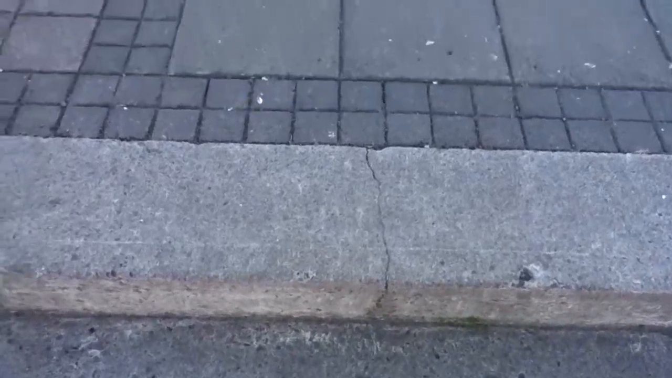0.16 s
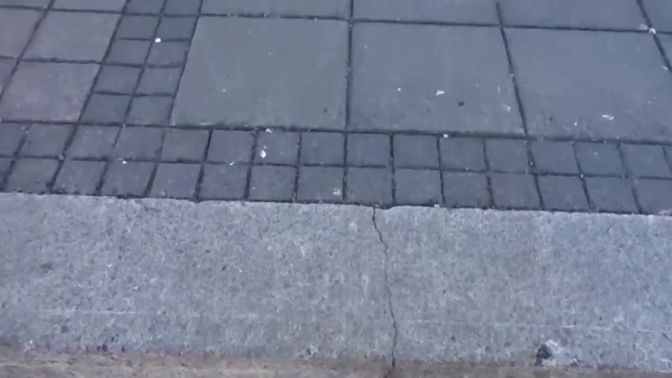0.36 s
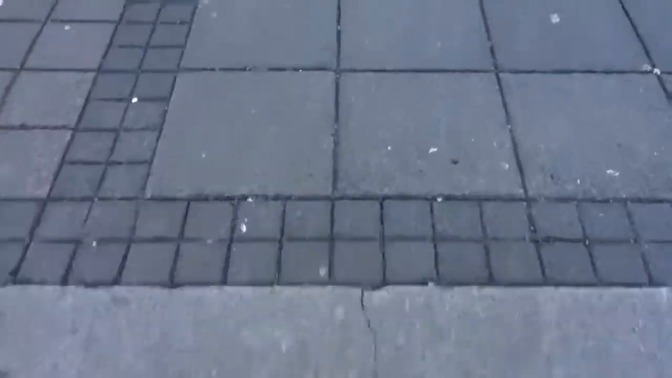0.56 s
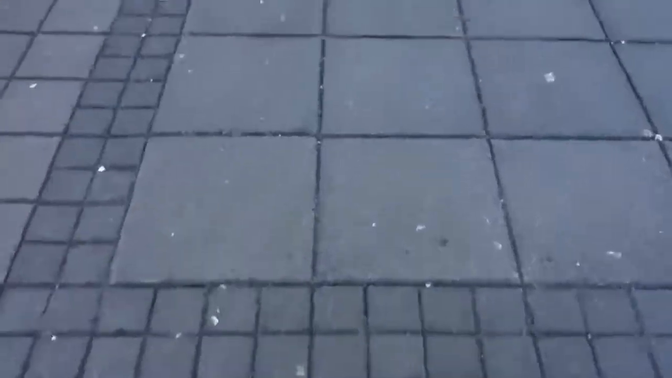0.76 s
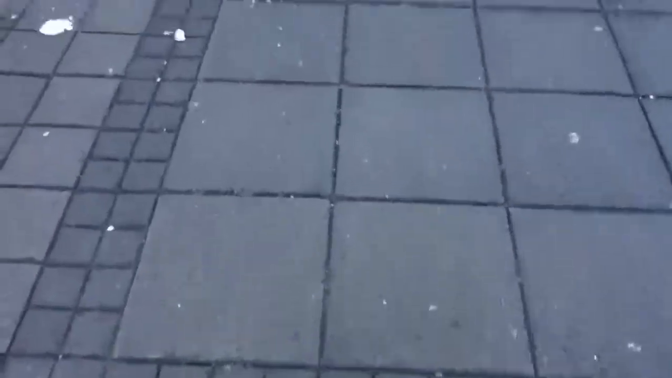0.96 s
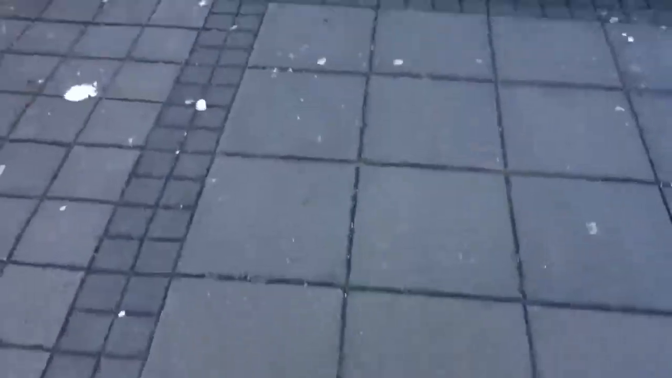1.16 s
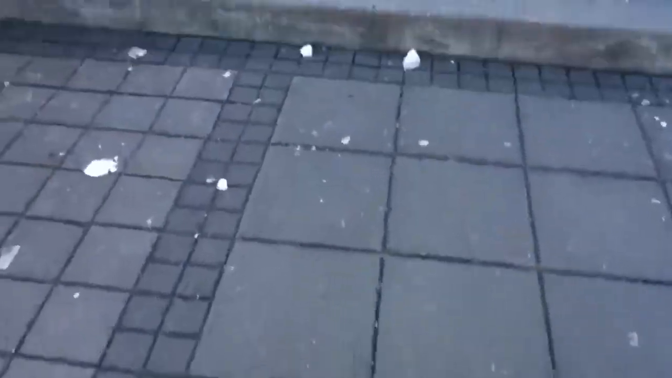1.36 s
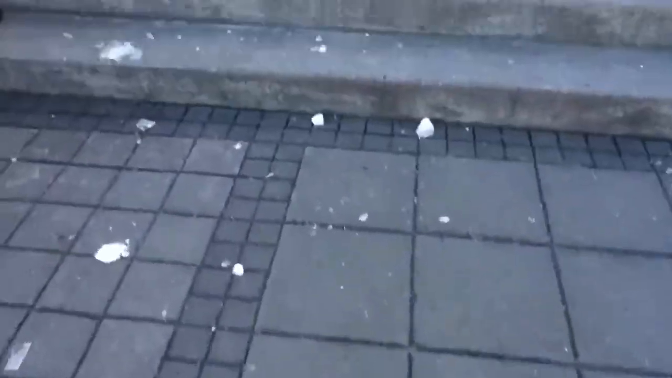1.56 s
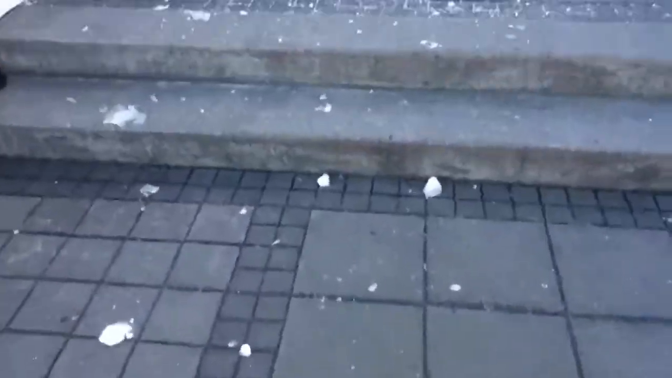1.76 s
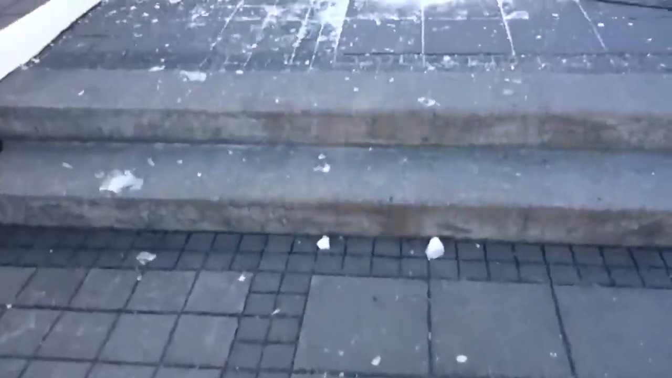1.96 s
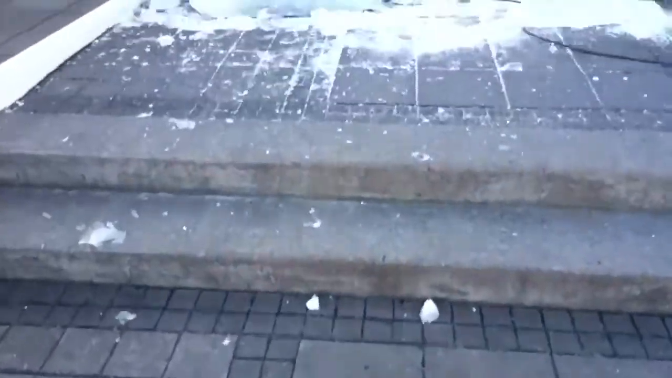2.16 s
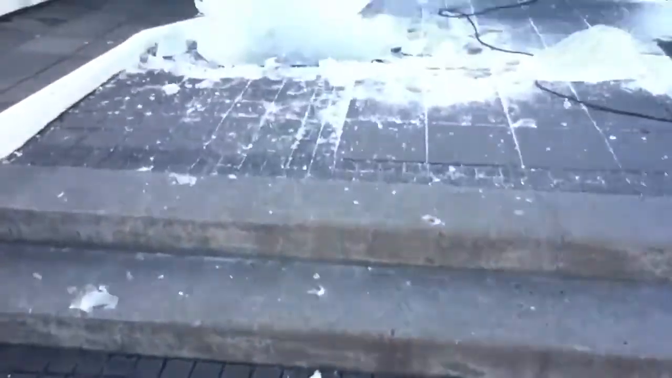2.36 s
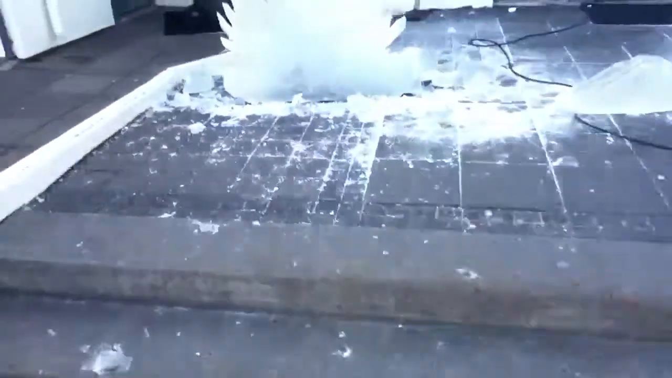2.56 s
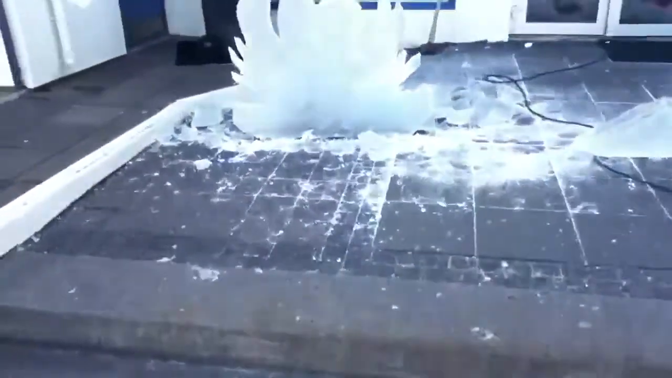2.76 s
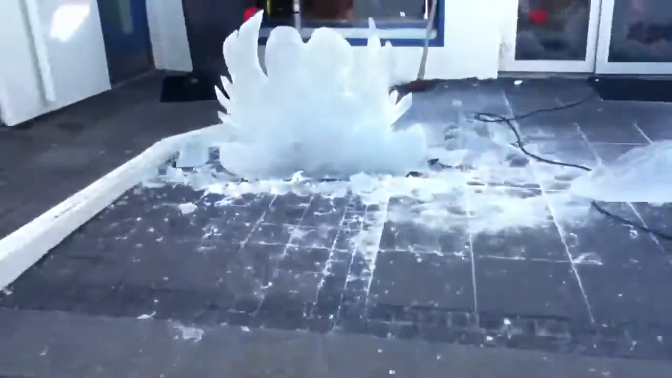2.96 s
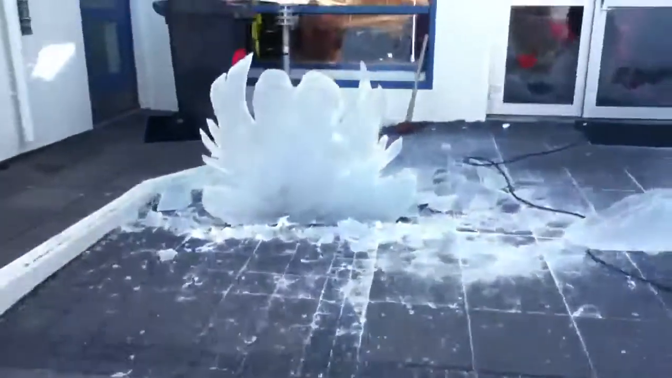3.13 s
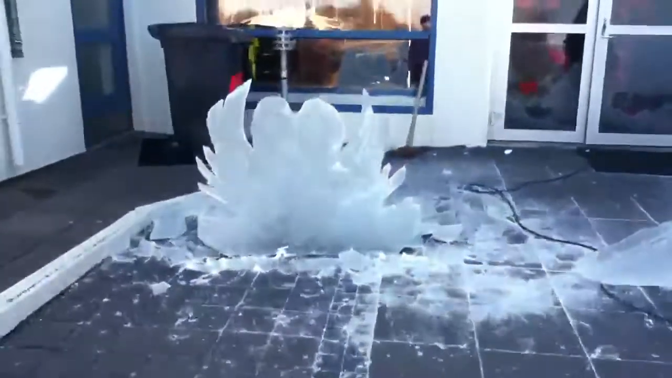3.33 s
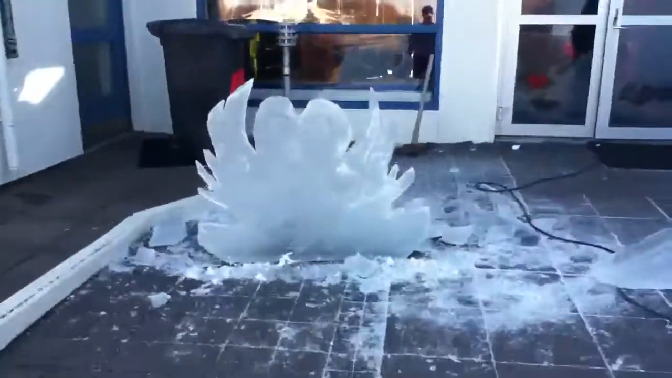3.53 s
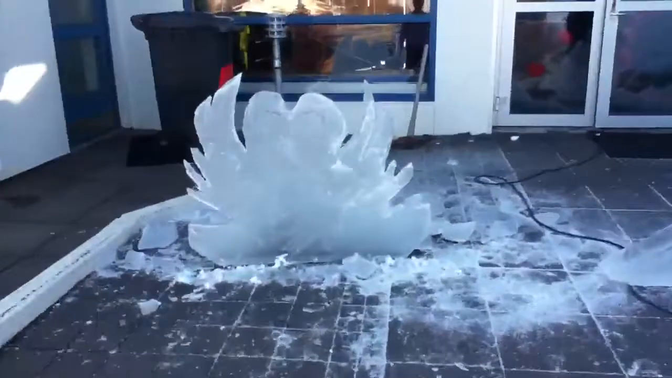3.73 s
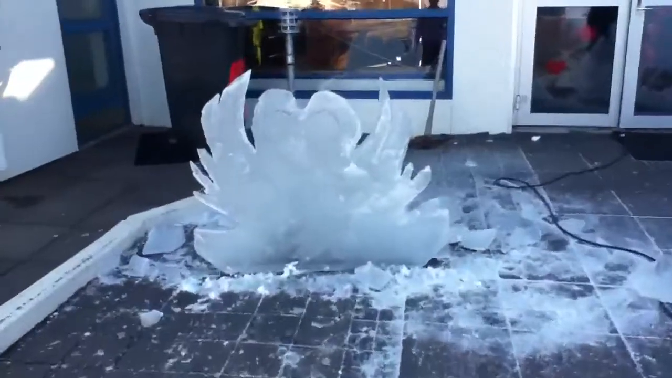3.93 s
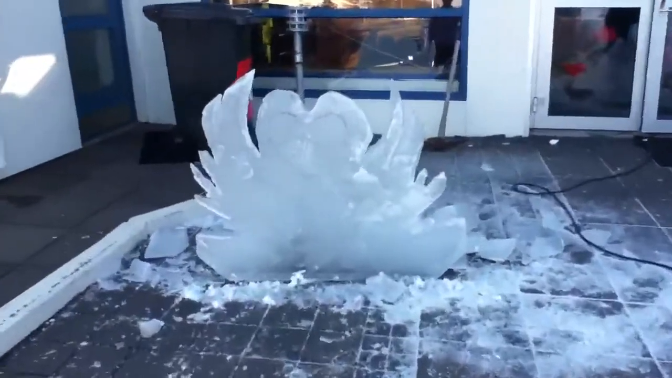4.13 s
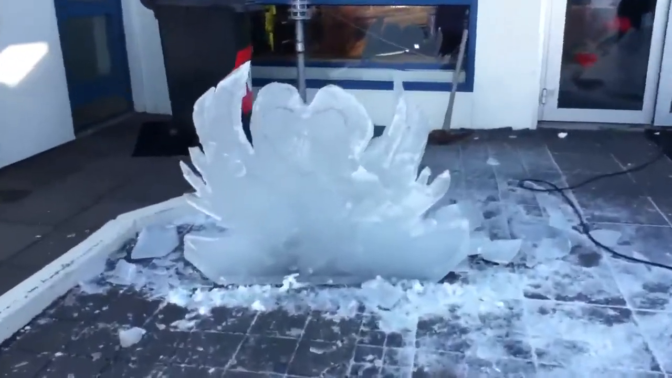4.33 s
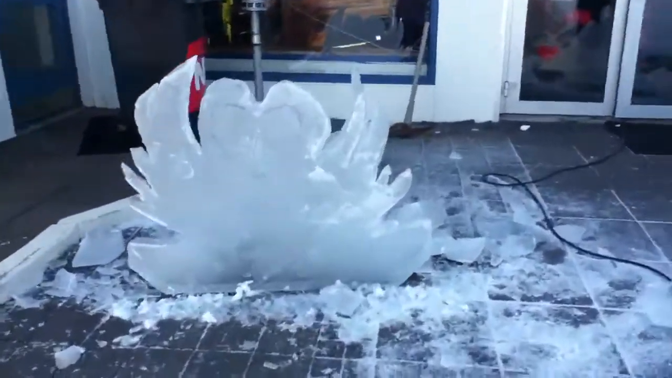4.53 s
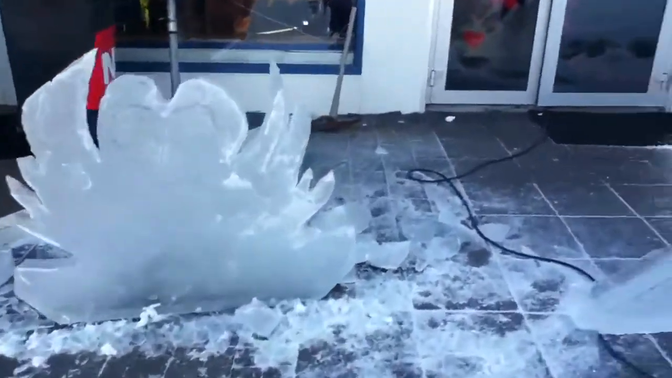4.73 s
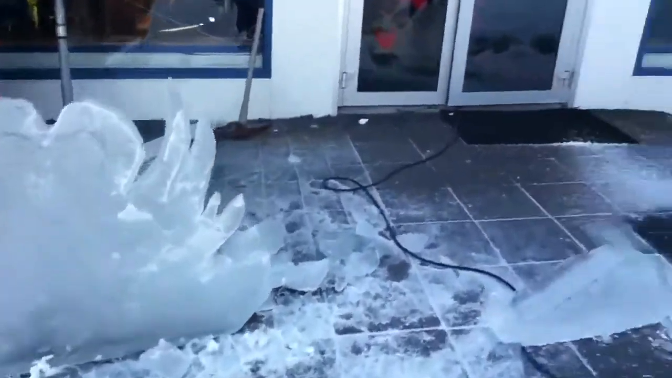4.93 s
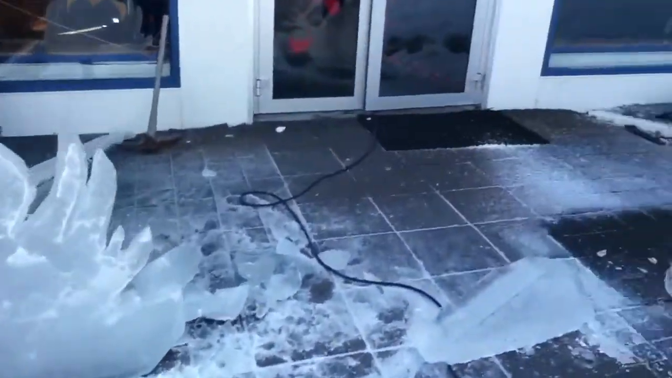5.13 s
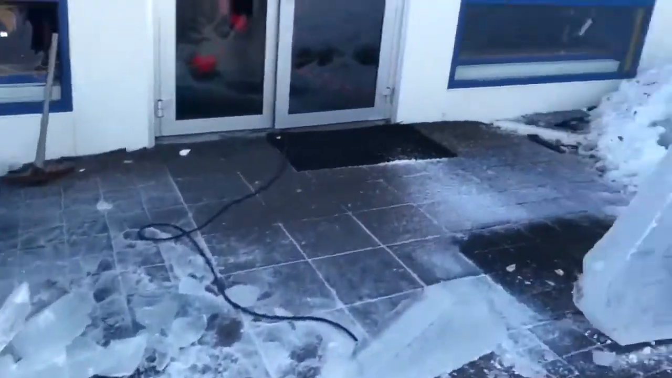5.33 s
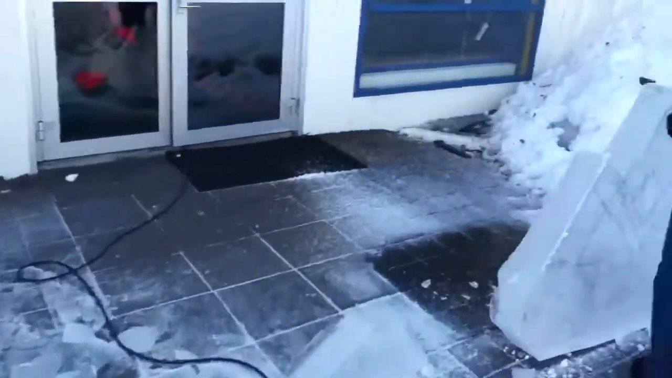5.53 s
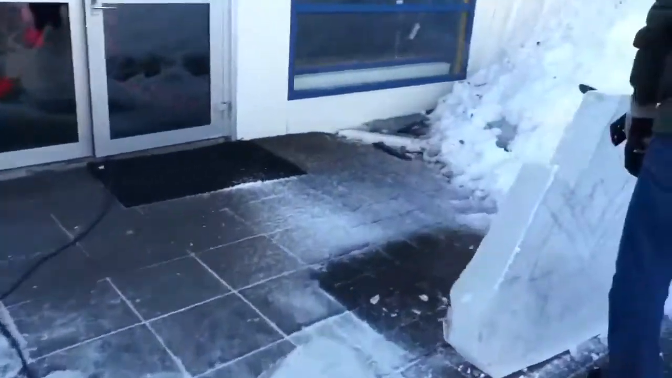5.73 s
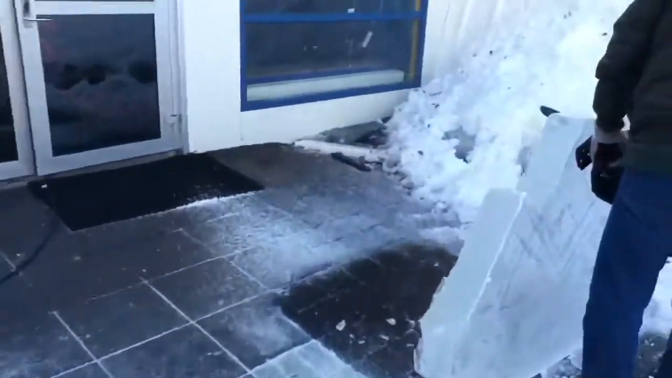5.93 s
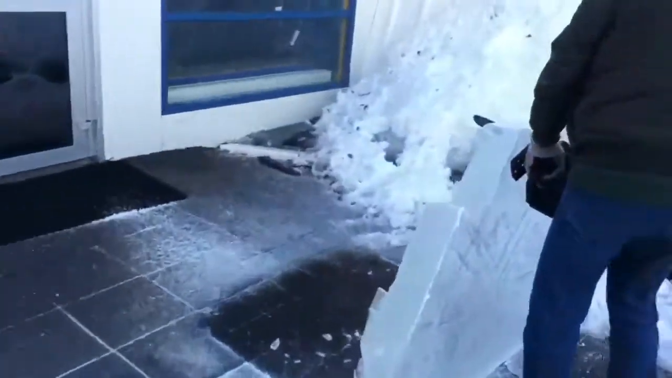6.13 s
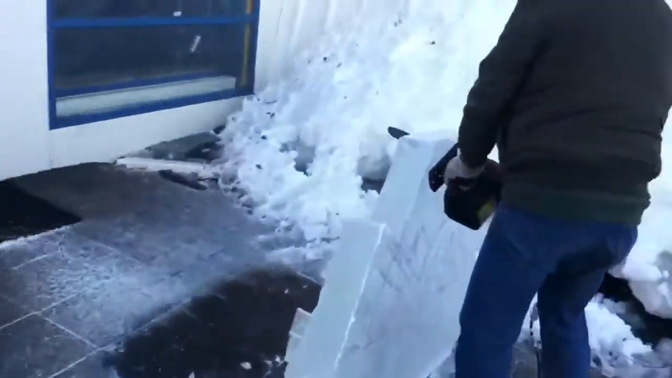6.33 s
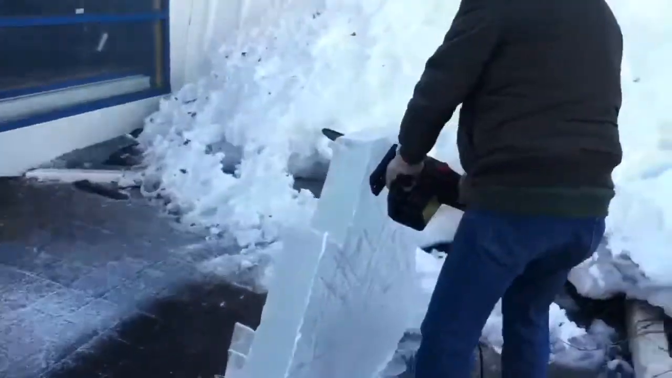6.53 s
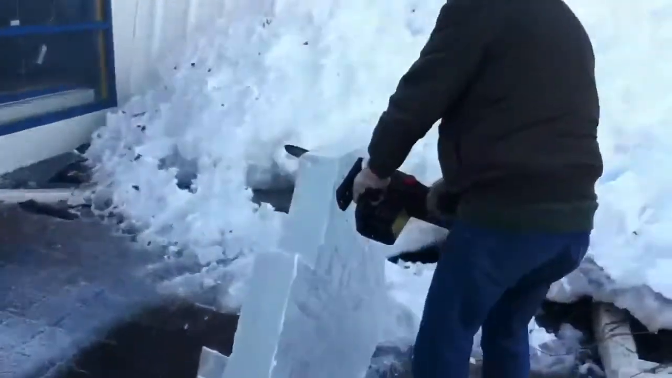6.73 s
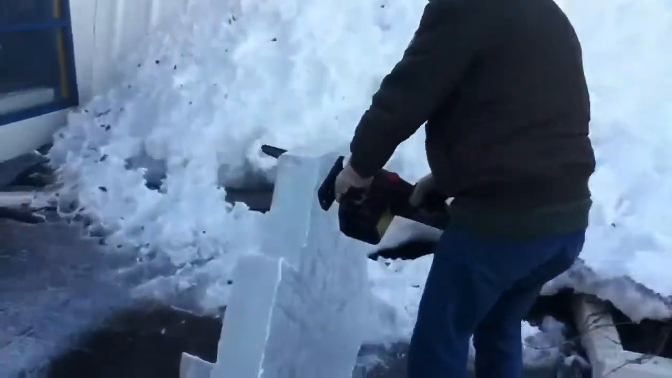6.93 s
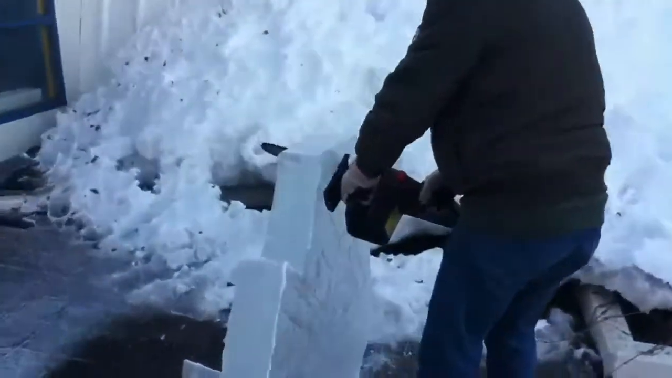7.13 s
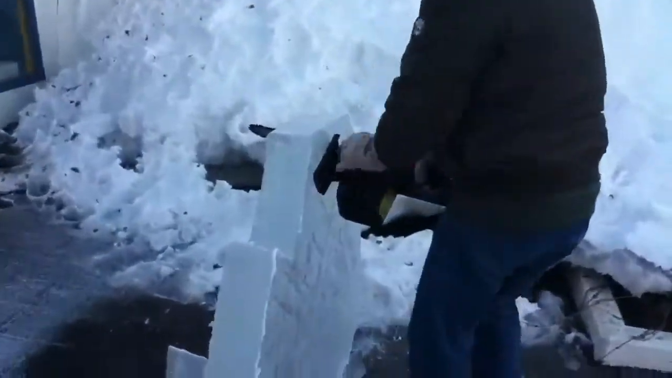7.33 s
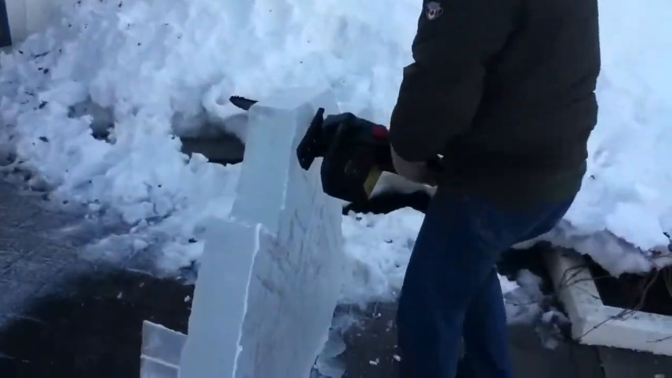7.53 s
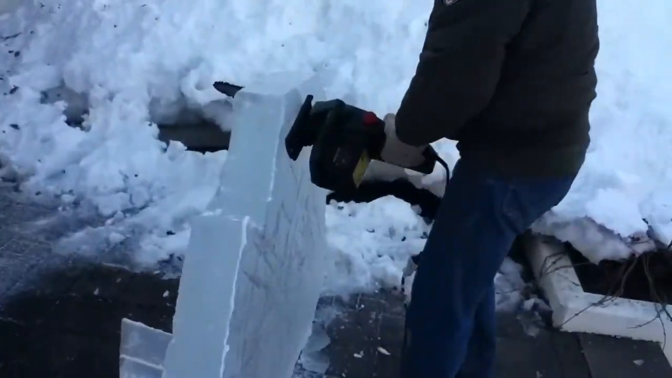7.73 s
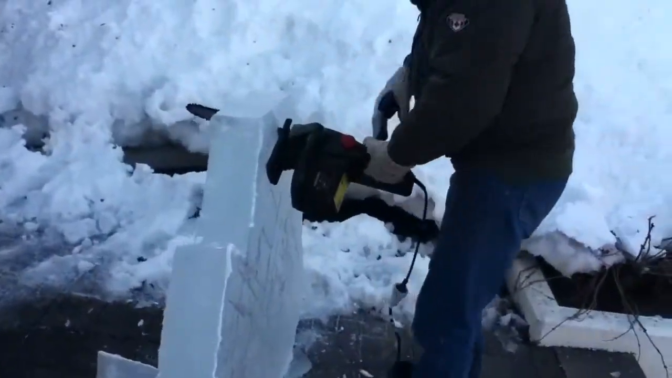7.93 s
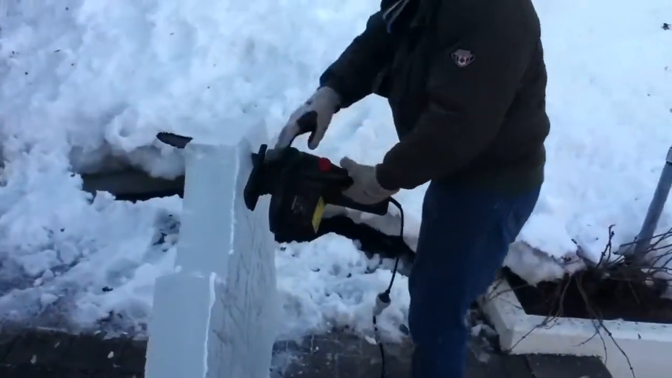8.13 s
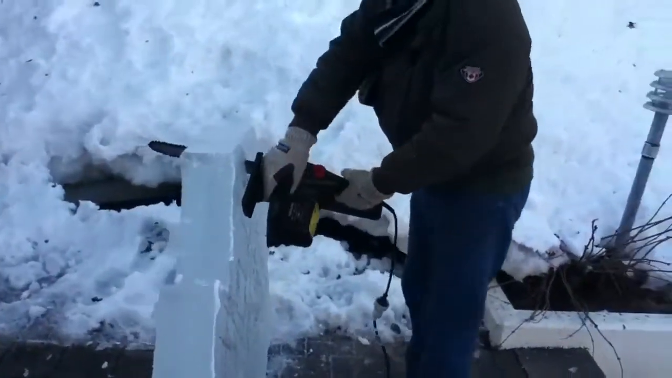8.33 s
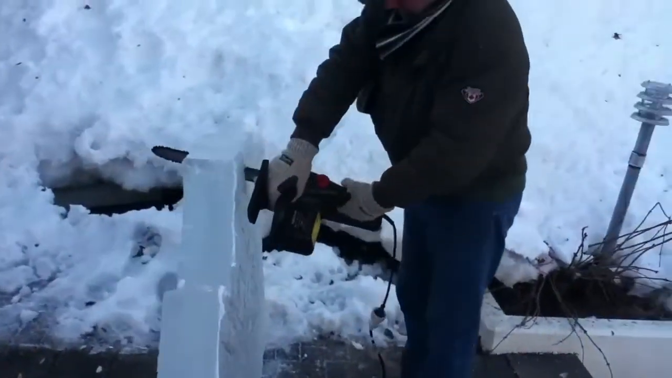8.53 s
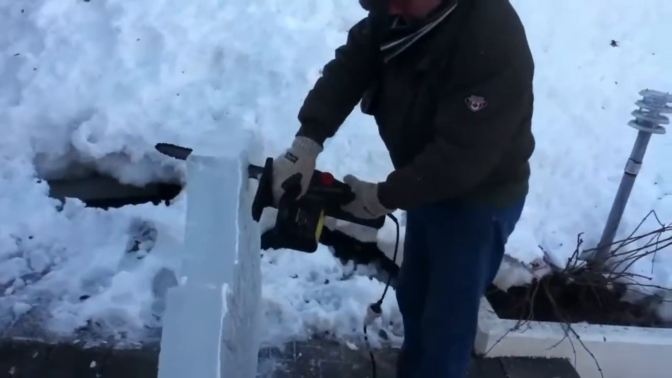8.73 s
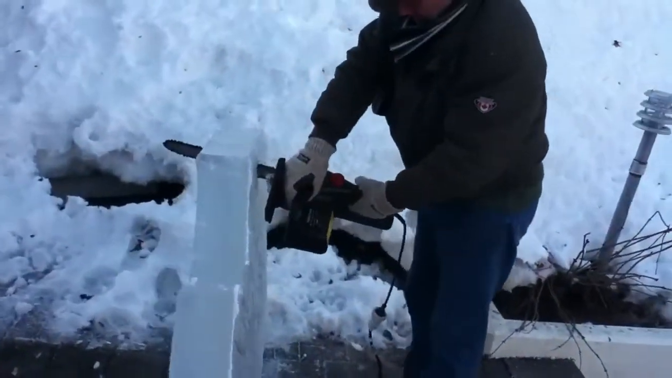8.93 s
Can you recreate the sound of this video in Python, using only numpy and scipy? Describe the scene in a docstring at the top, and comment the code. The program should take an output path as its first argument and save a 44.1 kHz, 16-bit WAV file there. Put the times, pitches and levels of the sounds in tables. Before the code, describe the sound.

An electric chainsaw is already running in ice outdoors, a steady rasping buzz with a high motor whine, moderately distant and slowly getting closer. Wind rumbles, knocks and pops on the handheld microphone, hardest around three to four seconds, briefly pushing the saw down. Near seven seconds the saw winds down abruptly, leaving wind thuds, a few dry ticks and soft rubbing over faint air.

```python
"""A corded electric chainsaw runs in a block of ice on a paved forecourt while the microphone walks up to it.
From the start, rasping noise pulses with the chain links, under sine lines of the motor, fan and chain.
Throughout, gusty wind rumbles, knocks and pops as shaped noise on the single microphone, over faint air;
the loudest buffets push the limiter, which ducks the whole sound and then creeps back.
Near 7 s the trigger is released and the saw brakes to a stop, leaving filtered-noise ticks and scrapes."""
import sys
import numpy as np
from scipy import signal
from scipy.io import wavfile
from scipy.ndimage import uniform_filter1d, minimum_filter1d

SR = 44100
rng = np.random.default_rng(int(sys.argv[2]) if len(sys.argv) > 2 else 0)


def materialize(psi):
    """Save the field psi as 16-bit PCM at rate SR to the path in sys.argv[1].

    A 1-D psi becomes a single channel; in a 2-D psi each row is a channel.
    """
    bounded = np.clip(np.atleast_2d(psi).T, -1, 1)
    quanta = np.round(bounded * 32767).astype(np.int16)
    wavfile.write(sys.argv[1], SR, quanta)


N = 400428
TIME = np.arange(N) / SR   # seconds


def from_db(db):
    """Decibels to gain."""
    return 10 ** (np.asarray(db) / 20)


def rms_one(x):
    """Scale to unit power."""
    return x / np.sqrt(np.mean(x ** 2) + 1e-20)


def in_time(rows):
    """Draw each column of an automation curve out to every sample."""
    s, *columns = np.transpose(rows)
    return [np.interp(TIME, s, column) for column in columns]


def cut(x, hz, kind, order=2):
    """Butterworth filter."""
    edges_hz = np.clip(hz, 10, .45 * SR)
    return signal.sosfilt(signal.butter(order, edges_hz, kind, fs=SR, output="sos"), x)


def drift(rate_hz):
    """Smooth random wander of spread 1; a higher rate moves faster."""
    step = 40   # samples between drawn points
    pole = np.exp(-2 * np.pi * rate_hz * step / SR)
    warm_up = 2000
    white = rng.standard_normal(N // step + 2 + warm_up)
    slow = signal.lfilter([1], [1, -2 * pole, pole * pole], white)[warm_up:]
    return np.interp(np.arange(N) / step, np.arange(len(slow)), rms_one(slow))


def banded_noise(spectrum, patchy_db):
    """Noise in bands of .4 octave, each flickering on its own; rms 1."""
    edges = 20 * 2 ** np.arange(0, 10.1, .4)
    hz, db = np.transpose(spectrum)
    white = rng.standard_normal((2, N))   # neighbouring bands take turns with two sources
    out = 0
    for k, (low, high) in enumerate(zip(edges, edges[1:])):
        level_db = np.interp(np.log(low * high) / 2, np.log(hz), db)
        flicker = from_db(level_db + patchy_db * drift(22.0))
        out = out + flicker * cut(white[k % 2], [low, high], "band")
    return rms_one(out)


def puff():
    """White noise for one short event."""
    return rng.standard_normal(SR // 6)


def burst(s, peak_db, colour, rise, fall, squareness):
    """A short swell of the given noise, crest at time s; a squarer one starts and stops more abruptly."""
    lag = (np.arange(len(colour)) - len(colour) // 2) / SR
    # line the envelope up with the strongest sample near the middle
    crest = np.argmax(abs(colour) * (abs(lag) < .004))
    lag = lag - lag[crest]
    swell = colour * np.exp(-np.maximum(-lag / rise, lag / fall) ** squareness)
    scaled = from_db(peak_db) * swell / abs(swell).max()
    return np.interp(TIME, s + lag, scaled, left=0, right=0)


def gate(start, length, attack, release):
    """Quick rise that is full at start, hold, dying tail."""
    opening = np.clip((TIME - start) / attack + 1, 0, 1)
    return opening * np.exp(-np.clip((TIME - start - length) / release, 0, 20))


# colour of the background air: pitch_hz, relative level_db [dB per Hz]
AIR_SPECTRUM = [(60, 8), (300, -12.5), (900, -3.5), (1600, -4.5), (3000, -16), (5000, -18.5), (9000, -24),
                (12000, -17), (15500, -42.5)]


def background_air():
    """A faint bed of noise whose bands flicker independently."""
    return from_db(-53) * banded_noise(AIR_SPECTRUM, patchy_db=2.3)


# gusts on the microphone: start_s (full strength), hold length_s, rumble level_db
GUSTS = [(0.626, 0.15, -18), (0.944, .28, -18), (1.362, 0.18, -18.5), (1.621, 0.43, -16),
         (2.273, 0.39, -21), (2.855, .36, -10), (3.632, 0.54, -9.5), (4.237, 0.56, -12.5),
         (4.853, .58, -23.5), (5.504, 0.17, -25), (5.973, 0.17, -24.5), (6.897, 0.3, -27),
         (7.524, 0.58, -20), (8.27, 0.54, -28.5)]
GUST_ATTACK_S, GUST_RELEASE_S = 0.029, 0.089
BREEZE_DB = -31.5   # floor between the gusts


def wind_force():
    """The strongest of breeze and gusts at each moment sets the wind's gain."""
    force = np.full(N, from_db(BREEZE_DB))
    for start, length, db in GUSTS:
        force = np.maximum(force, from_db(db) * gate(start, length, GUST_ATTACK_S, GUST_RELEASE_S))
    return force


# colour of the wind rumble: pitch_hz, relative level_db [dB per Hz]
RUMBLE_SPECTRUM = [(20, -30.5), (50, -10.5), (90, -1), (150, 1.5), (260, -1.5), (450, -11.5), (800, -20),
                   (1500, -45), (4000, -63.5)]


def wind_rumble(force):
    """The wind drives a low, lumpy noise on the microphone."""
    lumpy = banded_noise(RUMBLE_SPECTRUM, patchy_db=3.0) * from_db(3.24 * drift(25))
    return force * rms_one(lumpy)


def eddy(s, db, hz, length):
    """One eddy hits the port: a dull knock, higher when it is fast."""
    colour = cut(cut(puff(), hz, "low"), .36 * hz, "high")
    colour = cut(colour, 3.1 * hz, "low", order=4)
    return burst(s, db, colour, rise=length, fall=length, squareness=1.41)


# small eddies: height over the wind force, its spread, middle pitch and length of rise and fall
EDDIES_PER_S, EDDY_DB, EDDY_SPREAD_DB, EDDY_HZ, EDDY_S = 14, 8.5, 3, 421.5, 0.0047


def small_eddies(force):
    """Little knocks ride on the wind, one at a random moment in each slot; quick ones are higher and shorter."""
    out = np.zeros(N)
    for slot in np.arange(0, N / SR, 1 / EDDIES_PER_S):
        s = slot + rng.random() / EDDIES_PER_S
        size, pace = rng.standard_normal(2)
        quick = 2 ** (0.32 * pace)
        knock = eddy(s, EDDY_DB + EDDY_SPREAD_DB * size, EDDY_HZ * quick, EDDY_S / quick)
        out += np.interp(s, TIME, force) * knock
    return out


# hard buffets: crest_s, peak level_db, eddy pitch_hz, rise and fall length_s
BUFFETS = [(0.663, -2.5, 414, 0.0057), (1.055, 3, 495, 0.014), (1.222, -4, 590, 0.02),
           (1.384, 0.5, 333, 0.0046), (1.487, -3, 420, 0.0044), (1.582, -0.5, 420, 0.0037),
           (1.662, 1, 480, 0.0021), (1.821, 0.5, 320, 0.011), (1.904, -1, 292, 0.02), (2.041, 3, 357, .01),
           (2.29, -3, 447, 0.0082), (2.553, 3.5, 580, 0.013), (2.59, 0.5, 540, 0.018),
           (2.78, 0, 366, 0.016), (2.956, 8.5, 298, 0.016), (3.007, 6.5, 312, 0.018),
           (3.069, 6.5, 600, 0.024), (3.178, 5.5, 632, 0.0076), (3.217, 4, 266, 0.013),
           (3.642, 6.5, 626, 0.0062), (3.673, 5, 406, 0.03), (3.824, -0.5, 416, 0.049),
           (4.362, 3.5, 425, 0.023), (4.534, 5.5, 380, 0.018), (4.649, 0, 376, 0.019),
           (4.696, 5, 442, 0.008), (4.774, 3.5, 375, 0.0075), (4.96, -8, 200, .015),
           (5.274, -4.5, 379.6, .003), (5.648, -7.5, 250, .012), (6.122, -4.5, 308, 0.0059),
           (6.892, -8, 249.4, .005), (6.938, -9, 350, 0.014), (6.973, -5, 438, 0.01),
           (7.013, -12, 500, 0.02), (7.168, -5.5, 384, 0.01), (7.52, 1, 463, .005), (7.547, -4, 364, 0.013),
           (7.675, 0.5, 373, 0.013), (7.766, -7, 420, 0.0038), (7.816, -2, 413, 0.0053),
           (7.887, 0.5, 453, 0.0063), (7.962, 3, 520, 0.0074), (8.003, 0, 510, .0078),
           (8.09, -11, 490, .009), (8.289, -11, 380, .005), (8.355, -11, 360, 0.0063),
           (8.49, -12, 497, 0.0012), (8.533, -9.5, 326, 0.005), (8.59, -9.5, 320, 0.0027),
           (8.764, -7.5, 260, 0.0079)]


def hard_buffets():
    """Strong eddies knock on the microphone as swells of dull noise."""
    return sum(eddy(*buffet) for buffet in BUFFETS)


# sharp pops of air at the port: crest_s, peak level_db
POPS = [(1.055, -9), (2.553, -5), (2.598, -4), (3.056, 3.5), (3.669, 5.5), (3.699, 2.5), (3.784, 0.5),
        (4.692, -16), (7.521, -3.5), (7.598, -15.5), (7.812, -1.5), (8.016, -3), (8.046, -18), (8.089, -24),
        (8.303, -22), (8.357, -27), (8.49, -43)]


def port_pops():
    """Air pops at the port: brighter noise that leaps up and dies quickly."""
    out = np.zeros(N)
    for s, db in POPS:
        crack = cut(cut(puff(), 1840, "low", order=4), 270, "high")
        out += burst(s, db, crack, rise=0.0012, fall=0.0017, squareness=0.96)
    return out


def wind():
    """Gusts over a breeze drive the rumble and small eddies; hard buffets knock and pops crack on top."""
    force = wind_force()
    return wind_rumble(force) + small_eddies(force) + hard_buffets() + port_pops()


# ticks of the saw and ice chips: crest_s, peak level_db, upper edge_hz
TICKS = [(7.149, -30.5, 5960), (7.2, -41, 11000), (7.246, -25, 2240), (7.263, -31, 10100),
         (7.651, -28, 5970), (7.669, -29, 6000), (8.176, -33, 4000), (8.221, -27.5, 5000),
         (8.432, -37, 4500), (8.971, -37, 7900)]


def ticks():
    """Dry clicks of the saw and ice chips: noise with a sharp onset and a short tail."""
    out = np.zeros(N)
    for s, db, hz in TICKS:
        colour = cut(cut(puff(), 1050, "high"), hz, "low")
        out += burst(s, db, colour, rise=0.00036, fall=0.0023, squareness=0.53)
    return out


# the saw shifts in the cut, sleeves rub: start_s, length_s, final level_db
RUBS = [(7.276, 0.2, -51), (7.88, 0.075, -51), (8.397, 0.75, -56.5)]
RUB_SWELL_DB, RUB_EDGE_S = 10, 0.022
# colour of the rubbing: pitch_hz, relative level_db [dB per Hz]
SCRAPE_SPECTRUM = [(500, -8), (1500, 5), (3500, -2), (8000, -1.5), (11000, -6.5), (15500, -15)]


def scrapes():
    """Soft rubbing noise; each rub swells to its final level, then stops."""
    rubbing = np.zeros(N)
    for start, length, db in RUBS:
        remaining = np.clip(1 - (TIME - start) / length, 0, 1)
        rubbing += from_db(db - RUB_SWELL_DB * remaining) * gate(start, length, RUB_EDGE_S, RUB_EDGE_S)
    return rubbing * banded_noise(SCRAPE_SPECTRUM, patchy_db=3.0)


def line(turns, multiple, waver_db, blur):
    """One partial; reflections met while walking make its level and phase wander."""
    level = from_db(waver_db * drift(5.0))
    return rms_one(level * np.sin(2 * np.pi * multiple * turns + blur * drift(4)))


# the guide bar rings in the cut: time_s, level_db relative to the rasp
BAR_RING = [(0, -12.5), (2.2, -24.5), (3.4, -7.5), (4.5, -14), (5.4, -10), (6.8, -41)]
# band of the ringing: low_hz, high_hz
BAR_BAND = [2683, 2980]
# lines that swell when the bar rings: multiple of the motor speed, level_db relative to its ringing
BAR_LINES = [(7.998, -7.5), (8.18, -4)]


def bar(links, turns):
    """The steel bar answers the passing links with a rough, narrow band, and lifts motor lines with it."""
    ring_db, = in_time(BAR_RING)
    knocks = rng.standard_normal(N) * from_db(2.0 * np.cos(2 * np.pi * links))
    ringing = rms_one(cut(knocks, BAR_BAND, "band"))
    lifted = sum(from_db(db) * line(turns, multiple, waver_db=2.5, blur=0.6) for multiple, db in BAR_LINES)
    return from_db(ring_db) * (ringing + lifted)


# colour of the teeth in the ice: pitch_hz, relative level_db [dB per Hz]
RASP_SPECTRUM = [(150, -6), (450, -5), (700, 0), (950, -1.5), (1300, -1.5), (1800, 3.5), (2400, -1),
                 (3250, 3), (4000, 1), (6500, 0.5), (10000, 0), (12500, -12.5), (15500, -10.5)]


def tooth_rasp(links, body_db):
    """Teeth shave the ice: noise that swells at every link and flutters as the teeth catch."""
    beat = np.cos(2 * np.pi * links) + np.cos(4 * np.pi * links)
    rasp = banded_noise(RASP_SPECTRUM, patchy_db=0.5) * from_db(1.6 * beat + .5 * drift(46.9))
    return rasp + (from_db(body_db) - 1) * cut(rasp, [900, 2200], "band", order=1)


# main tones relative to the rasp, before their trims: time_s, level_db
CHAIN_SECOND = [(0, -15), (1, -11.5), (2, -4), (2.3, -15.5), (2.8, -4), (3.4, -22), (4, -9), (4.5, -13.5),
                (4.85, -5.5), (6.7, -11)]
CHAIN_THIRD = [(0, -3.5), (.7, 6.5), (.92, -5.5), (1.25, 0), (2.2, -3), (3, -14), (4.2, -9.5), (5.9, -16.5),
               (6.351, -5), (6.8, -14)]
FAN_TONE = [(0, -1), (.62, 0), (.8, -13), (.97, -2.5), (1.4, -11.5), (1.75, -6), (2.25, -7), (2.9, 0),
            (3.7, -9.5), (4.05, 1.5), (4.5, -0.5), (4.75, -4.5), (5.05, 5.5), (5.4, -6.5), (6.05, -4),
            (6.35, 1.5), (6.6, -7.5), (6.78, -4.5)]
# high motor whine relative to the rasp: time_s, 16th multiple level_db, 18th multiple level_db
HIGH_WHINE = [(0, -25, -18), (1.2, -33, -26), (3, -18, -17), (5.1, -16, -13), (5.5, -11.5, -27.5),
              (6.3, -11.5, -32), (6.5, -20, -29)]
# weaker lines: multiple of the link rate, level_db relative to the rasp
CHAIN_LINES = [(1, -28), (4, -18), (5, -26), (7, -29), (8, -28), (9, -22), (10, -27)]
# weaker lines: multiple of the motor speed, level_db relative to the rasp
MOTOR_LINES = [(8.74, -18.5), (9.26, -20), (9.61, -15.5), (10, -17.5)]
FAN_BLADES = 9
COASTING_DB, COASTING_S = -14, .015   # with the power off the fan tone falls away
# the fan tone flares as it sinks through the ring of the housing
HOUSING_HZ, HOUSING_WIDTH_HZ, HOUSING_DB = 1720, 370, 35


def whine(turns, links, speed, braking):
    """Chain and motor sing as sine lines locked to their rotation, the fan ringing its housing."""
    second_db, = in_time(CHAIN_SECOND)
    third_db, = in_time(CHAIN_THIRD)
    fan_db, = in_time(FAN_TONE)
    fan_db = fan_db + COASTING_DB * np.minimum(braking / COASTING_S, 1)
    off_ring = (FAN_BLADES * speed - HOUSING_HZ) / HOUSING_WIDTH_HZ
    fan_db = fan_db + HOUSING_DB * np.exp(-.5 * off_ring ** 2)
    # the fixed trims are in dB
    out = from_db(second_db - 3.5) * line(links, 2, waver_db=1.0, blur=.09)
    out += from_db(third_db - 2) * line(links, 3, waver_db=1.5, blur=.09)
    out += from_db(fan_db - 1.5) * line(turns, FAN_BLADES, waver_db=2.5, blur=0.23)
    for multiple, db in zip((16, 18), in_time(HIGH_WHINE)):
        out += from_db(db) * line(turns, multiple, waver_db=4.5, blur=.3)
    for cycles, lines in (links, CHAIN_LINES), (turns, MOTOR_LINES):
        for multiple, db in lines:
            out += from_db(db) * line(cycles, multiple, waver_db=3.5, blur=0.46)
    return out


# motor speed before braking, sagging as the chain bites deeper: time_s, speed [turns per s]
MOTOR_SPEED = [(0, 358), (.35, 356.7), (.8, 359.8), (1.15, 381.3), (1.55, 382.8), (1.77, 387), (2.1, 370.7),
               (2.55, 352), (3.1, 346), (3.8, 342.4), (4.6, 346.6), (5.1, 343), (5.82, 345), (6.43, 375),
               (6.8, 376)]
# saw before its fade, growing as the microphone nears: time_s, level_db, extra body near 1.5 kHz body_db
SAW_LEVEL = [(0, -26.5, 6), (.6, -23.5, 5.5), (1.2, -26.5, 4.5), (1.8, -25.5, 4.5), (2.5, -25.5, 2),
             (3.1, -22, 4), (3.55, -20, -0.5), (3.9, -18.5, 1), (4.5, -20.5, 2), (5, -19, -1),
             (5.6, -18, 0.5), (6.15, -19, 3), (6.3, -15.5, 2), (6.8, -15.5, 4)]
LINKS_PER_TURN = 1.432
# the trigger is let go: the speed dies away and the saw fades ever faster
RELEASE_S, BRAKE_S = 6.814, 0.21
FADE_20_DB_S, FADE_POWER = 0.1213, 1.33
BRAKING_BELOW = 320   # turns per s; slower than this the slack chain snatches
SLACK_BODY_DB, SLACK_SNATCH = 32.5, .25   # what a fully slack chain adds


def chainsaw():
    """Links strike the sprocket and shave the ice; the motor, geared to them, sings, then brakes."""
    braking = np.maximum(TIME - RELEASE_S, 0)
    speed = in_time(MOTOR_SPEED)[0] * np.exp(-braking / BRAKE_S)
    slack = np.maximum(1 - speed / BRAKING_BELOW, 0)
    level_db, body_db = in_time(SAW_LEVEL)
    level_db = level_db - 20 * np.minimum(braking / FADE_20_DB_S, 10) ** FADE_POWER
    body_db = body_db + SLACK_BODY_DB * slack
    # accumulate the slightly uneven speed into rotation
    snatch = slack * SLACK_SNATCH * drift(120)
    turns = np.cumsum(speed * (1 + .001 * drift(14.2) + snatch)) / SR
    links = LINKS_PER_TURN * turns
    saw = tooth_rasp(links, body_db) + whine(turns, links, speed, braking) + bar(links, turns)
    return from_db(level_db) * saw


def scene():
    """One microphone, the same in both channels."""
    mono = background_air() + wind() + ticks() + scrapes() + chainsaw()
    return np.array([mono, mono])


def limiter(x, ceiling_db, release_db_per_s):
    """The gain drops at once on a peak above the ceiling and creeps back."""
    over_db = np.maximum(20 * np.log10(abs(x).max(axis=0) + 1e-9) - ceiling_db, 0)
    recovery_db = release_db_per_s * TIME
    held_db = np.maximum.accumulate(over_db + recovery_db) - recovery_db
    # a short window rounds the corners of the gain
    gain_db = uniform_filter1d(minimum_filter1d(-held_db, size=65), size=65)
    return x * from_db(gain_db)


CUTOFF_HZ = 15900


def record(dry):
    """Limiter, then the top is cut."""
    limited = limiter(dry, ceiling_db=-3, release_db_per_s=20.5)
    return signal.sosfilt(signal.ellip(10, .1, 90, CUTOFF_HZ, fs=SR, output="sos"), limited)


dry = scene()
out = record(dry)
materialize(out)
```